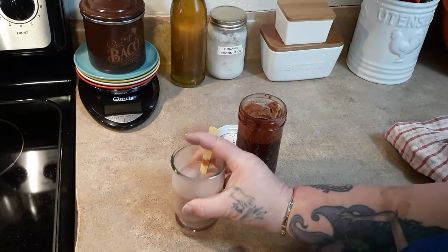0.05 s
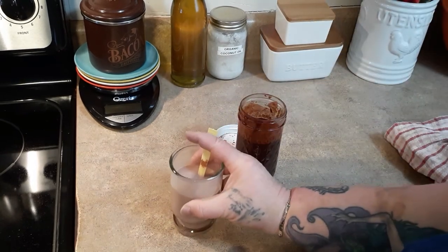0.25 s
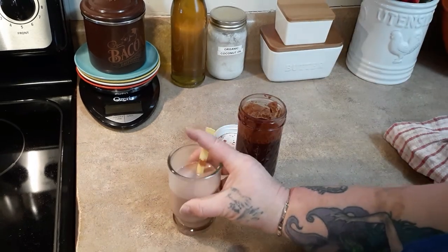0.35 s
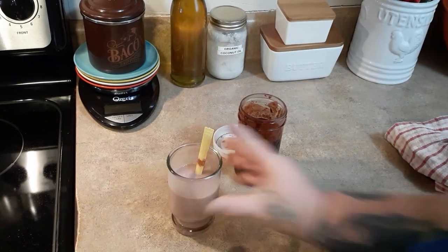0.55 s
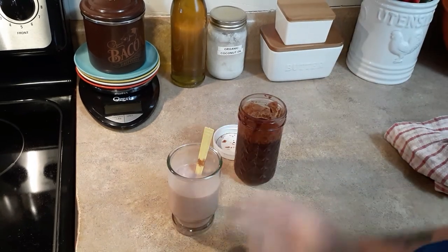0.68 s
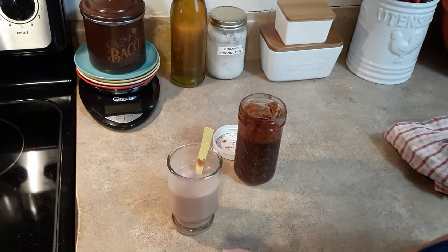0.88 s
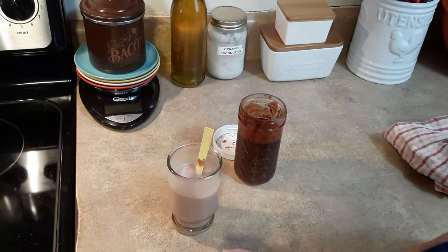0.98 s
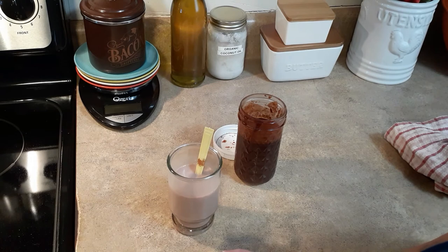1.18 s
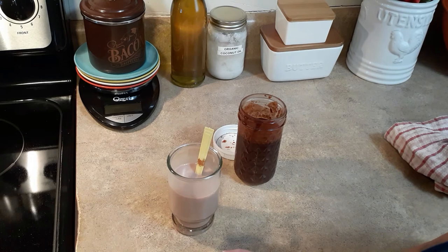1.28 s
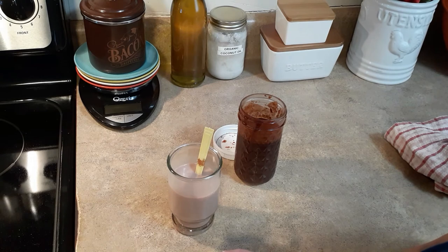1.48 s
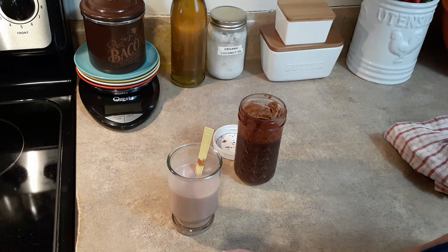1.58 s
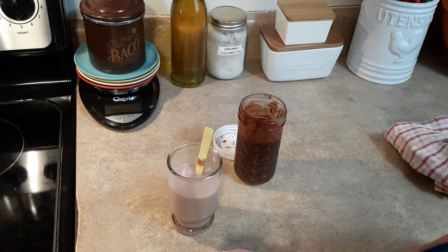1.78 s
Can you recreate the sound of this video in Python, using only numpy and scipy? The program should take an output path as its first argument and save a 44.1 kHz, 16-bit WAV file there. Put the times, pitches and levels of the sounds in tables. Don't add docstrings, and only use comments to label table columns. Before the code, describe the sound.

Heavy glass base lands and rocks on a kitchen counter in a few low thuds, then a rapid burst of hard clicks rattles and dies away, leaving quiet hum, hiss and tiny settling ticks, heard nearby.

```python
import sys
import numpy as np
from scipy import signal
from scipy.fft import rfft, irfft, next_fast_len
from scipy.io import wavfile
from scipy.ndimage import map_coordinates

SR = 44100
rng = np.random.default_rng(int(sys.argv[2]) if len(sys.argv) > 2 else 0)


def to_wav(s):
    ch = np.atleast_2d(s).T
    pcm = np.round(np.clip(ch, -1, 1) * 32767)
    wavfile.write(sys.argv[1], SR, pcm.astype(np.int16))


def ratio_of_db(decibels):
    return 10 ** (np.asarray(decibels, float) / 20)


N = 81585

# f/Hz, level/dB [per Hz]
HUM_SPECTRUM = [(15, -36), (25, -11), (54, -1.5), (209, -10.5), (244, -3.5), (327, -12.5), (394, -11),
                (537, -14.5), (1500, -22), (1950, -64.5), (3300, -120)]
HISS_SPECTRUM = [(600, -34), (1100, -10), (1900, -2.5), (7400, -18.5), (9500, -10), (12500, -7),
                 (15700, -5.5), (16300, -26)]
# f/Hz, correlation [-1 to 1]
FLOOR_CORRELATION = [(60, 0.8), (240, 0.91), (950, 0.09), (3770, 0.02), (15000, -0.83)]
# f/Hz, t60/s
KITCHEN_T60 = [(100, 0.38), (250, 0.21), (600, 0.25), (2200, 0.33), (6000, 0.33), (14000, 0.15)]
# f/Hz, correlation [-1 to 1]
ROOM_CORRELATION = [(150, 0.93), (600, .7), (1500, 0.078), (5000, 0.067)]
# delay t/s, left level/dB, right level/dB
REFLECTIONS = [(.0027, -4, -7), (.0056, -13.5, -5.5), (0.0133, -18.5, -12.5)]
# t/s, click level/dB, centre f/Hz, bandwidth/Hz, rustle t60/s
TICKS = [(0.102, -46.5, 12300, 8900, 0.016), (0.166, -39, 6995, 6050, 0.029),
         (0.1686, -37, 2990, 890, 0.038), (0.1767, -31.5, 2907, 920, 0.023),
         (0.166, -32.5, 8900, 3030, 0.025), (0.173, -33.5, 12200, 2950, 0.039),
         (0.177, -32, 8440, 1545, 0.021), (0.2, -48.5, 700.7, 903, 0.041), (0.381, -50.5, 8700, 253, 0.09),
         (.38, -55, 8050, 250, 0.09), (0.382, -57.5, 5700, 300, 0.09), (0.381, -64, 7090, 250, 0.08),
         (0.38, -44.5, 10470, 8700, 0.05), (0.473, -48, 8970, 4950, 0.14), (0.475, -56, 4410, 700, 0.088),
         (0.502, -54, 9000, 5950, 0.076), (0.561, -45, 11000, 8000, 0.019), (0.208, -46, 12040, 8900, 0.26),
         (1.2222, -44.5, 12710, 6030, 0.051), (1.343, -61.5, 8300, 500.6, 0.13),
         (1.342, -59.5, 5484, 400, 0.073), (1.344, -64, 6266, 400, 0.06), (1.505, -58, 1506, 2490, 0.011),
         (1.523, -52, 238, 110, 0.0076), (1.523, -54, 1500, 2430, 0.0083), (1.608, -54, 3904, 6016, 0.011),
         (1.781, -59, 2000, 2000, 0.012)]
# t/s, peak level/dB, contact spot [whole part: 0 = A, 2 = C]
KNOCKS = [
    (0.2069, -3, 0.92),
    (0.335, -18, 0),
    (0.3535, -4.5, 2),
    (0.4654, -14, 2.02),
]
# f/Hz, level/dB, t60/s
SPOT_A_MODES = [(130.7, -13.5, 0.088), (219.9, -9, 0.07), (303.5, -14.5, 0.3), (441, -13.5, 0.18),
                (502.6, 1, 0.073), (594.7, -8.5, 0.13), (685, -24, 0.21), (751, -13.5, 0.11),
                (918, -29, 0.16), (1070, -26, 0.037), (1460, -36.5, 0.049), (1629, -27.5, 0.065),
                (2226, -36.5, 0.082), (2570, -47, .1)]
SPOT_C_MODES = [(136, -3.5, 0.059), (163, -10.5, 0.23), (247.5, -8.5, 0.33), (293.4, 0, 0.085),
                (424, -17, 0.14), (475, -15.5, 0.078), (549, 6, 0.042), (638, -14.5, 0.27),
                (771, -24.5, 0.12), (870, -20, 0.025), (1020, -9.5, 0.032), (1795, -14, 0.029),
                (1947, -26.5, 0.05), (2238, -28.5, 0.11)]
# f/Hz, level/dB [per Hz]
THUD_SPECTRUM = [(41, -52), (70, -36), (574, -5), (881, -12), (1280, -15.5), (1790, -24.5), (2360, -28),
                 (3370, -42), (6000, -45.5), (7800, -91.5), (13200, -120)]
# t/s, peak level/dB, chatter length/s, brightness/dB per octave, first click [over chatter]
CLATTER = [(.7349, -11, .002, 1.5, 2.8), (.7374, -14, 0.0028, 0, 7.2), (.7402, -20.5, 0.0054, 3.5, 3),
           (.743, -20.5, .004, -0.5, 2.6), (.7525, -29, 0.0027, -1.5, 2.5), (.755, -28, 0.0042, -1.7, 1.7),
           (.7615, -32, .004, 1.4, 3), (.7826, -10.5, 0.0017, -0.96, 6.9), (.7845, -15, .006, 0.05, 3.2),
           (.796, -30.5, 0.0088, -0.6, 2.2), (.8055, -27, .003, 1.5, 2.2), (.8085, -15, 0.0027, -0.25, 6.2),
           (.8113, -19, 0.0056, -0.3, 3.1), (.8155, -18, 0.0034, -1.3, 3.3), (.8205, -18, 0.0026, 0.8, 5),
           (.8245, -24, 0.0038, 1, 2.5), (.8275, -21, 0.0046, -4.5, 4), (.833, -26.5, 0.0012, 2.5, 5.4),
           (.8375, -29.5, 0.0043, 0, 1.8), (.846, -28, .003, 2.1, 4.5), (.8535, -32.5, 0.0061, -1, 2.1),
           (.8585, -22.5, 0.0045, -2, 5.6), (.863, -29.5, .003, -3.3, 2.3), (.873, -36.5, 0.0073, -2, 2.1),
           (.884, -33.5, 0.0086, 0.5, 1.9), (.9022, -21.5, 0.001, 2.6, 3.8),
           (.9048, -25.5, 0.0041, -1, 3.5), (.94, -41, 0.0059, 2, 1.9), (1.075, -59, 0.059, -1.9, .52)]
# centre f/Hz, bandwidth/Hz, level/dB
PIECE_RESONANCES = [(2280, 1060, 2), (3770, 3100, -3), (8700, 2000, 4.5), (10440, 2200, -3.5),
                    (12640, 2200, 2)]
# f/Hz, level/dB
PIECE_TILT = [(90, -19), (200, -9.5), (600, -2), (1100, -3), (2500, -2), (6500, -7.5), (14500, -7.5),
              (15900, -13)]
# t/s, level/dB, f/Hz, t60/s
THUMPS = [(0.736, -28.5, 100.8, 0.061), (.756, -29.5, 94, 0.12), (.736, -37, 598, 0.12),
          (0.759, -42, 203, 0.092), (.785, -39.5, 263, 0.12), (.79, -40, 56, 0.17), (.808, -35, 612, 0.17),
          (0.809, -35, 67, 0.055), (0.811, -40, 328, 0.059), (.833, -38, 274, 0.06),
          (0.843, -46, 73, 0.091)]

LAG_S, KNOCK_LAG_S = 0.00045, 0.00008
HUM_PAN_DB, TICK_PAN_DB, KNOCK_PAN_DB, CLATTER_PAN_DB = -4, -9, -2.5, -4
TICK_WET_DB, NEAR_WET_DB, KNOCK_WET_DB, CLATTER_WET_DB = -3.5, -14, -9.5, -5.5
NEAR_AFTER_S = 1.3
KNOCK_EARLY_DB = -10.5


def unit(x):
    return x / np.sqrt(np.mean(x ** 2) + 1e-20)


def along(points, hz):
    f, v = np.transpose(points)
    return np.interp(np.log(hz + 1), np.log(f + 1), v)


def filtered(x, response):
    n = x.shape[-1]
    padded = 2 * next_fast_len(n // 2 + 4096)
    spectrum = rfft(x, padded) * response(np.fft.rfftfreq(padded, 1 / SR))
    return irfft(spectrum, padded)[..., :n]


def causal(gain):
    cepstrum = irfft(np.log(gain + 1e-6))
    half = len(cepstrum) // 2
    cepstrum[1:half] *= 2
    cepstrum[half + 1:] = 0
    return np.exp(rfft(cepstrum))


def peak(f, hz, wide_hz):
    damping = 1j * f * wide_hz
    return damping / (hz * hz - f * f + damping)


def pair(n, gain, alike):
    def mid_side(hz):
        angle = np.arccos(np.clip(along(alike, hz), -1, 1)) / 2
        return gain(hz) * [np.cos(angle), np.sin(angle)]

    mid, side = filtered(rng.standard_normal((2, n)), mid_side)
    return unit(np.array([mid + side, mid - side]))


def floor():
    t = np.arange(N) / SR
    sway_db = 0.98 * map_coordinates(rng.standard_normal(60), [t * 14])
    hum = ratio_of_db(-67 + sway_db) * pair(N, lambda f: ratio_of_db(along(HUM_SPECTRUM, f)), FLOOR_CORRELATION)
    left = ratio_of_db(HUM_PAN_DB) * np.roll(hum[0], round(LAG_S * SR))
    hum = np.array([left, hum[1]])
    hiss = ratio_of_db(-69) * pair(N, lambda f: ratio_of_db(along(HISS_SPECTRUM, f)), FLOOR_CORRELATION)
    whine = pair(N, lambda f: peak(f, 11580, 400) ** 2, FLOOR_CORRELATION)
    fading_db = np.interp(t, [0, 1.1, 1.5], [0, 0, -5])
    return hum + hiss + ratio_of_db(-68.5 + fading_db) * whine


def add(track, s, x, pan_db, wet_db, lag_s=LAG_S, early_db=0):
    noise = pair(SR // 2, np.ones_like, ROOM_CORRELATION)
    hz, t, z = signal.stft(noise, SR, nperseg=256)
    decay = ratio_of_db(-60 * t / along(KITCHEN_T60, hz)[:, None])
    tail = signal.istft(z * decay, SR, nperseg=256)[1]
    build_s = 0.012
    tail = tail * (1 - np.exp(-np.arange(tail.shape[1]) / SR / build_s))
    tail = ratio_of_db(wet_db) * tail / np.linalg.norm(tail[0])
    path = np.pad(tail, ((0, 0), (round(0.004 * SR), 0)))
    path[[0, 1], [round(abs(lag_s) * SR), 0]] += ratio_of_db(np.array([pan_db, -pan_db]) / 2)
    for late_s, left_db, right_db in REFLECTIONS:
        arrival_s = late_s + 0.0005 * rng.uniform(-1, 1, size=2)
        path[[0, 1], np.round(arrival_s * SR).astype(int)] += ratio_of_db(early_db + np.array([left_db, right_db]))
    out = signal.fftconvolve(x[None], path, axes=1)
    part = track[:, round(s * SR):][:, :out.shape[1]]
    part += out[:, :part.shape[1]]


def ticks():
    track, t = np.zeros((2, N)), np.arange(SR // 5) / SR
    for s, db, hz, wide_hz, t60 in TICKS:
        body = lambda f: peak(f, hz, wide_hz) ** 2
        click = filtered(1. * (t == 0), body)
        click = click / np.abs(click).max()
        rustle = unit(filtered(rng.standard_normal(len(t)), body)) * ratio_of_db(-6.5 - 60 * t / t60)
        tick = ratio_of_db(db) * (click + rustle)
        if s < NEAR_AFTER_S:
            add(track, s, tick, TICK_PAN_DB, TICK_WET_DB)
        else:
            add(track, s, tick, TICK_PAN_DB, NEAR_WET_DB, LAG_S, NEAR_WET_DB)
    return track


def knocks():
    track, t = np.zeros((2, N)), np.arange(SR // 3) / SR
    spots = {0: SPOT_A_MODES, 2: SPOT_C_MODES}
    for s, db, spot in KNOCKS:
        ring = 0
        for hz, level, t60 in spots[int(spot)]:
            fill_s = 0.0087 * min(300 / hz, 1) ** 3.4
            decay = ratio_of_db(level - 60 * t / min(t60, 0.12))
            ring = ring + decay * np.sin(2 * np.pi * hz * t) * (1 - np.exp(-t / fill_s))
        thud = unit(filtered(rng.standard_normal(len(t)), lambda f: ratio_of_db(along(THUD_SPECTRUM, f))))
        thud = thud * ratio_of_db(-11 - 60 * t / 0.076)
        rise = 1 - np.exp(-t / 0.0018)
        knock = -ratio_of_db(db) * (ring + thud) * rise
        add(track, s, knock, KNOCK_PAN_DB, KNOCK_WET_DB, KNOCK_LAG_S, KNOCK_EARLY_DB)
    return track


def clatter():
    track, t = np.zeros((2, N)), np.arange(SR // 5) / SR
    for s, db, length, bright_db, click in CLATTER:
        shifts = 1 + 0.037 * rng.standard_normal(len(PIECE_RESONANCES))

        def body(f):
            octaves = np.log2(np.clip(f, 1000, 16000) / 4500)
            tilt = causal(ratio_of_db(along(PIECE_TILT, f) + bright_db * octaves))
            resonances = sum(ratio_of_db(level) * peak(f, centre * shift, wide)
                             for (centre, wide, level), shift in zip(PIECE_RESONANCES, shifts))
            return tilt * (1 + 1.2 * resonances)

        bursts_db = 2.5 * np.repeat(rng.standard_normal(len(t) // 30), 30)
        spikes = rng.standard_normal(len(t)) * ratio_of_db(bursts_db)
        shape = np.exp(-(t / length) ** 2) + 0.12 * ratio_of_db(-60 * t / 0.036)
        spikes[0] = min(click, 7)
        chatter = filtered(spikes * shape, body) / np.std(filtered(spikes, body))
        add(track, s, ratio_of_db(db - 6.5) * chatter, CLATTER_PAN_DB, CLATTER_WET_DB)
    for s, db, hz, t60 in THUMPS:
        rise = 1 - np.exp(-t * hz / 0.53)
        thump = ratio_of_db(db - 60 * t / t60) * np.sin(2 * np.pi * hz * t) * rise
        add(track, s, thump, KNOCK_PAN_DB, KNOCK_WET_DB, KNOCK_LAG_S, KNOCK_EARLY_DB)
    return track


def scene():
    return floor() + ticks() + knocks() + clatter()


def low_pass(x):
    return signal.sosfilt(signal.butter(12, 16830, fs=SR, output="sos"), x)


def record(dry):
    def band(hz):
        low_cut = (1j * hz / (29 + 1j * hz)) ** 2
        return low_cut / (1 + (hz / 16000) ** 80)

    mix = filtered(dry, band)
    return low_pass(mix)


dry = scene()
out = record(dry)
to_wav(out)
```